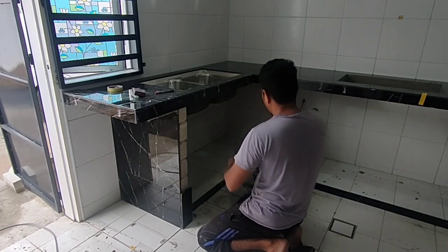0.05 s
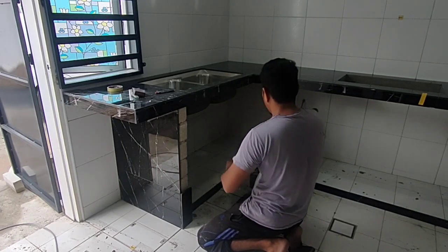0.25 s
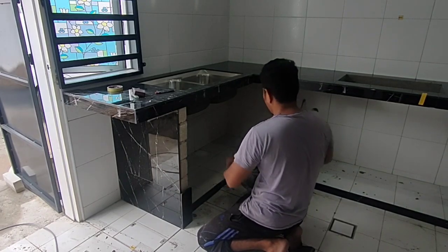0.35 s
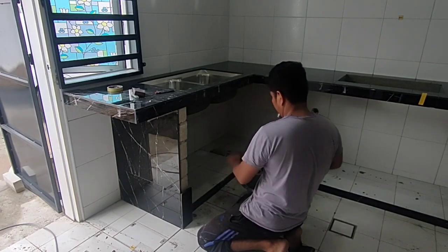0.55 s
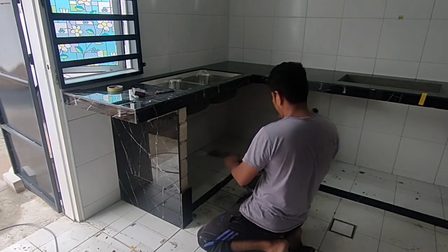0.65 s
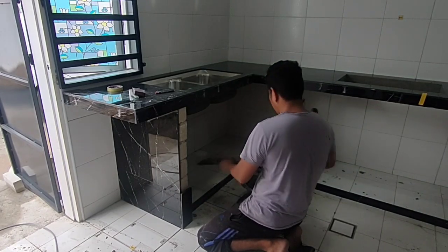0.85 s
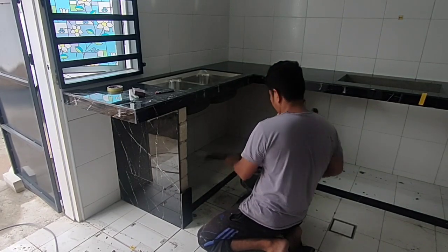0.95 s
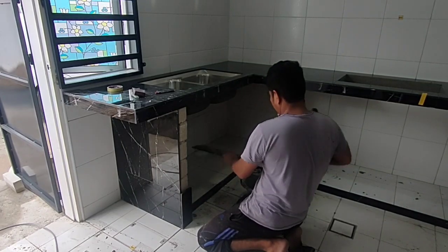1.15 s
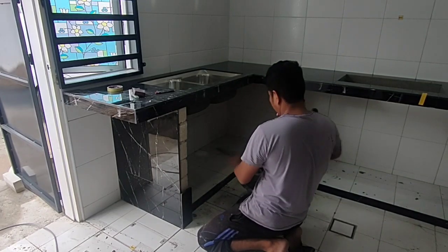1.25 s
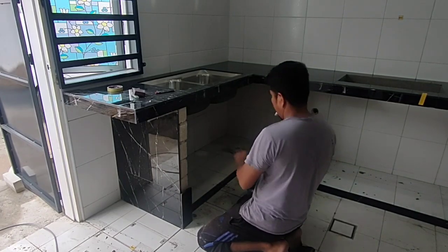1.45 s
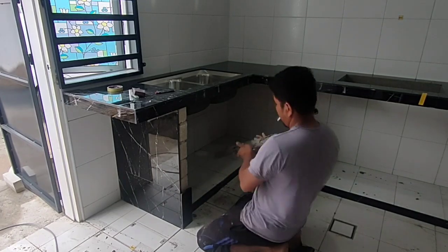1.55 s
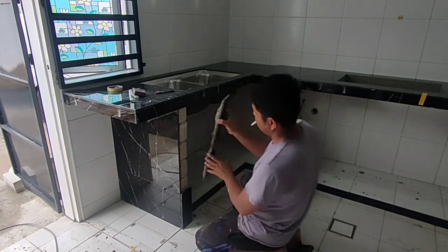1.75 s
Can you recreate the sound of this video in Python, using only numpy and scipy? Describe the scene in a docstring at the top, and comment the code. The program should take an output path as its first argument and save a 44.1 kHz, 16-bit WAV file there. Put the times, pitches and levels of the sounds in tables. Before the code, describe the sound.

Short, gritty trowel scrapes and a dull thump of mortar echo in a tiled room.

```python
"""A faint rumble fills a bare tiled kitchen. From the start, a steel trowel works gritty mortar in
short strokes, low down; sand grains catch under its edge and ring the blade and the slab beneath.
At about 1.4 s a soft load lands on the slab with a hollow thump. Two crumbs then tick on the tile,
and two faint strokes finish. The hard walls answer every scrape, thump and tick with a short echo."""
import sys
import numpy as np
from scipy import signal
from scipy.fft import rfft, irfft
from scipy.io import wavfile

SR = 44100
rng = np.random.default_rng(int(sys.argv[2]) if len(sys.argv) > 2 else 0)


def wrap_up_sound(samples):
    """Save the sound to the file named by the first command line argument, as 16-bit audio."""
    columns = np.atleast_2d(samples).T
    # keep every value between -1 and 1, then stretch to whole-number steps
    tamed = np.clip(columns, -1, 1)
    steps = np.round(tamed * 32767).astype(np.int16)
    wavfile.write(sys.argv[1], SR, steps)


N = 79380
T = np.arange(N) / SR

# Tone of the background rumble, meaning how strong it is from low to high: f/Hz, level/dB
RUMBLE_TONE = [(20, -4.5), (45, -5.5), (80, 1), (120, -8.5), (250, -10), (500, -24), (1000, -30.5),
               (3000, -27), (6000, -37.5), (10000, -35), (15000, -61)]
# Trowel strokes: t/s, length/s, level/dB, swell from start to end/dB, extra slab/dB, extra grit/dB
TROWEL_STROKES = [ (-0.04, 0.049, -53.5, 4, -5, 6.5), (0.033, 0.098, -73, -4.5, -5, 25.5),
                  (0.227, 0.026, -39.5, 6, -9.5, 8), (0.26, 0.016, -40, -3, -6, -6),
                  (0.324, 0.05, -34.5, 3, -5, 5.5), (0.375, 0.04, -36.5, 2, -1.5, 4.5),
                  (0.405, 0.05, -41.5, -22, 7, -9), (0.536, 0.021, -70, -2, -9, 16),
                  (0.577, 0.04, -38.5, 6.5, -2, 5.5), (0.666, 0.028, -46, -22, -10, -3),
                  (0.736, 0.059, -52, 0.5, 13.5, 8), (0.768, 0.041, -47.5, 4, 15, -17),
                  (0.827, 0.021, -57, -21, -5, -2), (0.925, 0.025, -45, 4.5, -9, 9.5),
                  (0.953, 0.025, -40.5, 3, -27.5, 5), (0.983, 0.043, -40.5, -6, -26, 5.5),
                  (1.088, 0.026, -36, 5, -17, 7), (1.115, 0.019, -26.5, 4.5, -6, 1),
                  (1.138, 0.026, -39.5, -5.5, -4.5, -18), (1.246, 0.029, -42.5, 3.5, -6, 3),
                  (1.294, 0.036, -40, 7.5, -16, 7), (1.322, 0.041, -41, -8, -12, -8),
                  (1.437, 0.016, -50.5, 4.5, 10, -2.5), (1.531, 0.021, -56.5, -6, 11, 1),
                  (1.659, 0.073, -70.5, 5, -6, 0), (1.74, 0.05, -68.5, 0.5, -12, -2), ]
# Tone of the steel edge rasping over sand: f/Hz, level/dB
RASP_TONE = [(150, -51.5), (450, -20.5), (700, -13), (930, -4), (1180, -8.5), (1500, -4.5), (2100, 0),
             (2500, -4), (3000, -1), (3400, -6.5), (4300, -6), (4950, -17), (6100, -17), (7200, -30.5),
             (15500, -55)]
# Deeper tone of the slab under the scrape: f/Hz, level/dB
SLAB_TONE = [(60, -27), (170, -24), (290, -6.5), (430, -1), (540, 1), (660, -7.5), (900, -2.5),
             (1400, -16.5), (2500, -27), (8000, -35.5)]
# Hissy tone of the fine grit: f/Hz, level/dB
GRIT_TONE = [(1500, -5.5), (4000, 11), (5000, -2.5), (6200, 5), (7200, -4.5), (8200, 3), (9500, -3),
             (11300, -2.5), (12700, -11), (15500, -5.5)]
# Notes the blade rings at: f/Hz, level/dB, fade time/s (a fade time is how long a 60 dB drop takes)
BLADE_NOTES = [(980, -7.5, 0.067), (1517, -9, 0.3), (1730, 9.5, .15), (1955, 7, 0.16), (3000, -16, .12),
               (2935, 11, 0.15), (3075, 17, 0.056), (3730, 17.5, 0.058), (4160, -8, 0.09)]
# The soft load lands in folds, one push each: t/s, level/dB, contact time/s
LOAD_FOLDS = [(1.4383, -4.5, 0.0012), (1.4508, 2.5, 0.00061), (1.4612, -2.5, 0.00085),
              (1.478, -4.5, 0.0011), (1.493, -10, .0016), (1.528, -14, 0.0018)]
# Hollow notes the slab rings at: f/Hz, level/dB, fade time/s
SLAB_NOTES = [(143, -21, 0.18), (223.4, -2.5, 0.21), (294, -1.5, 0.15), (333, -0.5, 0.38),
              (385.7, 5.5, 0.14), (424, 7, 0.069), (467, -2, 0.11), (539, 1.5, 0.27), (693, -15, 0.048),
              (700, -8, 0.14), (1010, 5, .17)]
# Dull tone of the load's splat: f/Hz, level/dB
SPLAT_TONE = [(40, -25), (130, -26), (230, -2.5), (500, 10), (700, -12), (1000, -12.5), (1300, -19),
              (4000, -50)]
# Crumbs hitting the tile: t/s, level/dB
CRUMB_FALLS = [(1.538, -75), (1.628, -85.5)]
# Bright tone of a crumb's tick: f/Hz, level/dB
CRUMB_TONE = [(300, -47), (1500, 7), (4200, 8), (6000, -8.5), (9000, -11), (15500, -59)]
# How long the wall echoes last: f/Hz, fade time/s
WALL_FADES = [(150, 0.12), (500, 0.29), (1400, 0.31), (3500, 0.3), (8000, 0.21), (15000, 0.13)]
# How much louder the left side is than the right: f/Hz, level/dB
LEFT_OVER_RIGHT = [(100, 0.5), (300, 1.5), (600, 3.5), (1200, 1), (2200, 2.8), (4000, -0.4), (8000, -1.5),
                   (13000, -5)]

GRAINS_PER_S, GRAIN_SPREAD_DB = 8000, 2.5
CATCHES_PER_S, CATCH_DB = 200.7, 2.5  # how fast and how much the scrape flickers as sand catches
TROWEL_DB = -1
BLADE_DB, SLAB_DB, GRIT_DB = -13, -11, -15  # compared with the rasp
PATCH_HZ, SCRAPE_PATCHY_DB, GRIT_PATCHY_DB = 170.6, 2.9, 5  # each new blade angle shifts the tone's peaks
THUMP_DB, SPLAT_DB, SPLAT_DECAY_S = -50, -50, 0.022
ECHO_DB, THUMP_ECHO_DB = 3.5, -2.5  # compared with the direct sound
RECESS_DB, RECESS_FADE_S = -1, 0.15  # quick echoes in the space under the counter


def undb(db):
    """Turn decibels into a number to multiply by."""
    return 10 ** (np.asarray(db) / 20)


def unit(x):
    """Scale a sound so that its average power is 1."""
    return x / np.sqrt(np.mean(x ** 2) + 1e-20)


def fade(age, fade_s):
    """A smooth dying away that drops 60 dB in fade_s seconds."""
    return np.exp(-np.log(1000) * age / fade_s)


def along(points, hz):
    """Read between the (f/Hz, value) rows of a table, giving each octave equal room."""
    freqs, values = np.array(points, float).T
    return np.interp(np.log(np.maximum(hz, 1)), np.log(freqs), values)


def convolve(x, response):
    """Pass a sound through something, given how that thing answers a single click."""
    n = x.shape[-1]
    return irfft(rfft(x, 2 * n) * rfft(response, 2 * n))[..., :n]


def colour(x, tone, patchy_db=0, size=4096):
    """Give a sound the tone in a table; patchy_db adds chance peaks and dips."""
    hz = np.fft.rfftfreq(size, 1 / SR)
    ripple = np.interp(hz / PATCH_HZ, np.arange(size), rng.standard_normal(size))
    log_response = irfft(np.log(undb(along(tone, hz) + patchy_db * ripple)))
    # fold it forward in time, so the filter never answers before it is struck
    log_response[1:size // 2] *= 2
    log_response[size // 2 + 1:] = 0
    response = irfft(np.exp(rfft(log_response)))
    return convolve(x, response / np.linalg.norm(response))


def ring(x, notes):
    """Shake an object with x, so that it rings at its own fading notes."""
    age = T[:len(x)]
    response = sum(undb(db) * np.cos(2 * np.pi * hz * age) * fade(age, fade_s) for hz, db, fade_s in notes)
    return convolve(x, response / np.linalg.norm(response))


def add(track, sound, start):
    """Mix a stereo sound into a track, beginning at start seconds."""
    at = int(round(start * SR)) + np.arange(sound.shape[-1])
    inside = (at >= 0) & (at < N)
    track[:, at[inside]] += sound[:, inside]


def rumble(level_db=-68, side_db=-9.5, rise_db_per_s=2):
    """A faint, low noise that slowly grows, much alike on the left and the right."""
    middle, side = colour(rng.standard_normal((2, N)), RUMBLE_TONE)
    stereo = middle + undb(side_db) * side * np.array([[1], [-1]])
    return stereo * undb(level_db + rise_db_per_s * (T - T.mean()))


def sand_catching(count):
    """The scrape's strength wanders up and down as sand catches under the edge."""
    wander = np.interp(T[:count] * CATCHES_PER_S, np.arange(count), rng.standard_normal(count))
    return undb(CATCH_DB * unit(wander))


def grains(count):
    """Sand grains crack in quick succession, most of them small, a few large."""
    present = rng.random(count) < GRAINS_PER_S / SR
    size = undb(GRAIN_SPREAD_DB * np.minimum(rng.exponential(size=count), 5))
    return unit(present * size * rng.choice([-1, 1], count))


def trowel(attack_s=0.011, release_s=0.0035, count=8192):
    """Each stroke drags the edge over sand: one push drives the rasp, slab, grit and ringing blade."""
    scrapes = np.zeros((2, N))
    age = T[:count]
    for start, length, db, swell_db, slab_db, grit_db in TROWEL_STROKES:
        press = np.minimum(age / attack_s, 1) * np.exp(-np.maximum(age - length, 0) / release_s)
        press *= undb(db + swell_db * np.minimum(age / length, 1))
        strength = np.sqrt(np.mean(press ** 2))
        drag = press * sand_catching(count)
        rasp = unit(colour(drag * grains(count), RASP_TONE, SCRAPE_PATCHY_DB))
        slab = undb(SLAB_DB + slab_db) * unit(colour(drag * grains(count), SLAB_TONE, SCRAPE_PATCHY_DB))
        grit = undb(GRIT_DB + grit_db) * unit(colour(drag * grains(count), GRIT_TONE, GRIT_PATCHY_DB))
        blade = undb(BLADE_DB) * unit(ring(drag * grains(count), BLADE_NOTES))
        stroke = strength * (rasp + blade + slab + grit)
        add(scrapes, in_room(stroke, ECHO_DB), start)
    return undb(TROWEL_DB) * scrapes


def echoes(count, build_s=0.00076):
    """The walls and the space under the counter throw sound back; middle pitches last longest."""
    age, hz = T[:count], np.fft.rfftfreq(count, 1 / SR)
    noise_spectrum = rfft(rng.standard_normal((2, count)))
    walls = 0
    for band_hz, fade_s in WALL_FADES:
        band = along([(f, f == band_hz) for f, _ in WALL_FADES], hz)  # 1 at this row, 0 at the others
        walls += irfft(noise_spectrum * band, count) * fade(age, fade_s)
    recess = rng.standard_normal((2, count)) * fade(age, RECESS_FADE_S)
    tail = (unit(walls) + undb(RECESS_DB) * unit(recess)) * (1 - np.exp(-age / build_s))
    return tail / np.linalg.norm(tail, axis=1, keepdims=True)


def in_room(x, echo_db, right_lag_s=0.00003, count=16384):
    """The sound arrives directly, a little later on the right; each new spot has its own echoes."""
    direct = np.sinc((T[:count] - np.array([[0], [right_lag_s]])) * SR)
    response = (direct + undb(echo_db) * echoes(count)) / np.hypot(1, undb(echo_db))
    return signal.fftconvolve(x[None], response, axes=1)


def thump():
    """The load lands in soft pushes that ring the hollow slab, each with a short, dull splat."""
    push, splat_strength = np.zeros((2, N))
    for start, db, contact_s in LOAD_FOLDS:
        age = np.maximum(T - start, 0)
        push += undb(db) * np.exp(-(2 * (T - start) / contact_s) ** 2) / contact_s
        splat_strength += undb(db) * (T > start) * np.exp(-age / SPLAT_DECAY_S)
    splat = colour(splat_strength * rng.standard_normal(N), SPLAT_TONE)
    return undb(THUMP_DB) * unit(ring(push, SLAB_NOTES)) + undb(SPLAT_DB) * unit(splat)


def crumbs(decay_s=0.0004):
    """Tiny bits of mortar hit the tile, each making a very short tick of noise."""
    bursts = np.zeros(N)
    for start, db in CRUMB_FALLS:
        burst = (T > start) * np.exp(-np.abs(T - start) / decay_s)
        bursts += undb(db) * unit(burst)
    return colour(bursts * rng.standard_normal(N), CRUMB_TONE)


def scene():
    """Strokes, thump and crumbs sound in the tiled room, mostly a little to the left, over the rumble."""
    work = trowel()
    add(work, in_room(thump(), THUMP_ECHO_DB), 0)
    add(work, in_room(crumbs(), ECHO_DB), 0)
    lean_db = along(LEFT_OVER_RIGHT, np.fft.rfftfreq(N, 1 / SR))
    side_gains = undb(np.array([lean_db, -lean_db]) / 2)
    return irfft(rfft(work) * side_gains, N) + rumble()


def record(dry):
    """Cut away the very highest treble."""
    top_hz = 15650
    return signal.sosfilt(signal.ellip(10, .2, 70, top_hz, fs=SR, output="sos"), dry)


dry = scene()
out = record(dry)
wrap_up_sound(out)
```